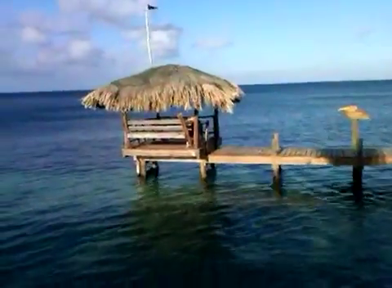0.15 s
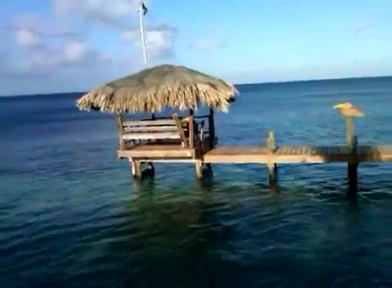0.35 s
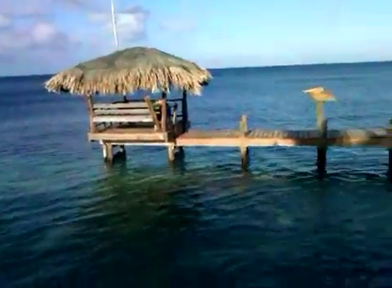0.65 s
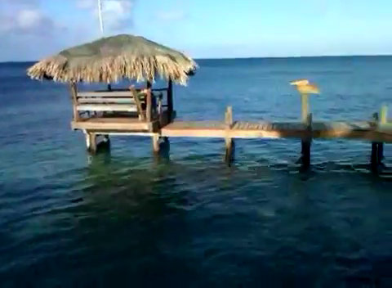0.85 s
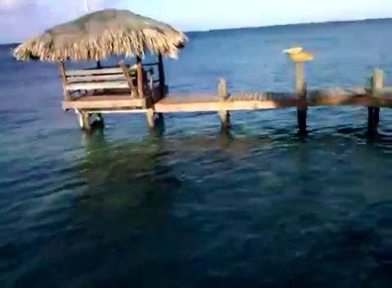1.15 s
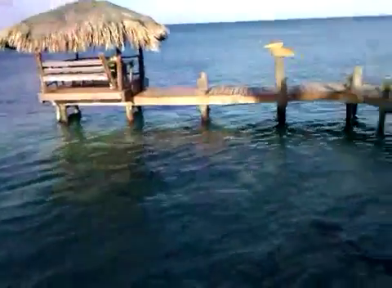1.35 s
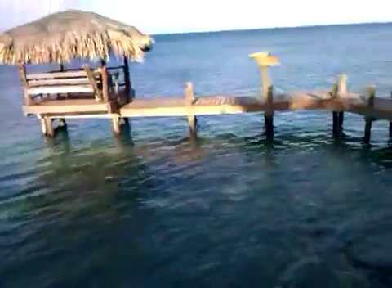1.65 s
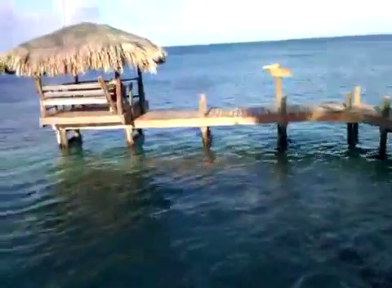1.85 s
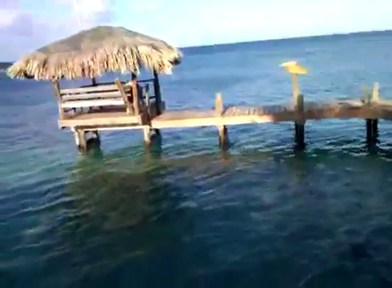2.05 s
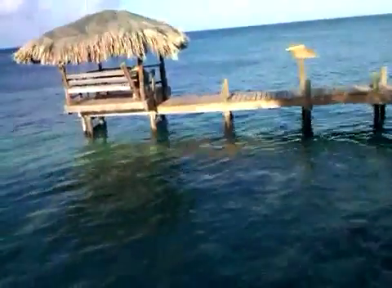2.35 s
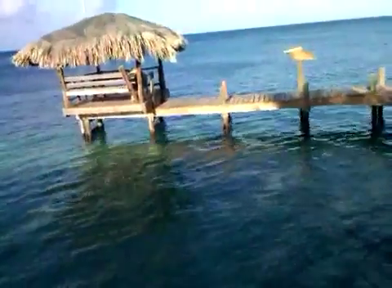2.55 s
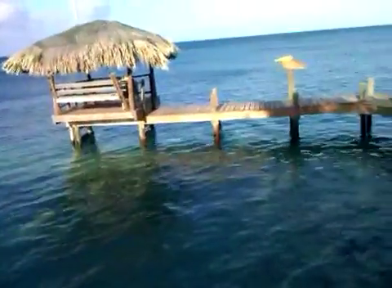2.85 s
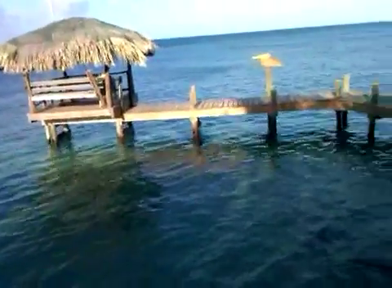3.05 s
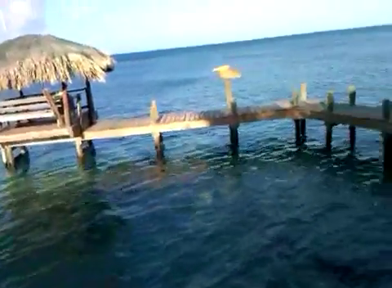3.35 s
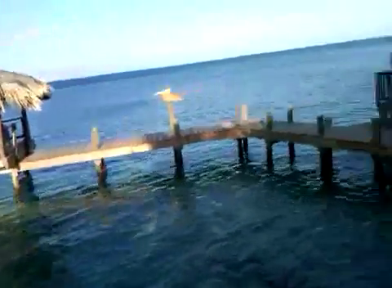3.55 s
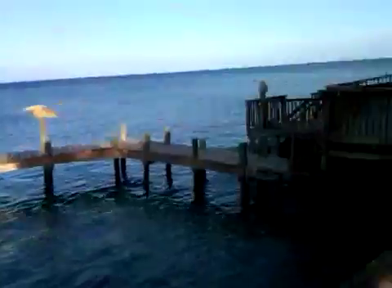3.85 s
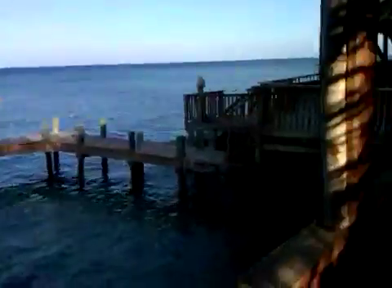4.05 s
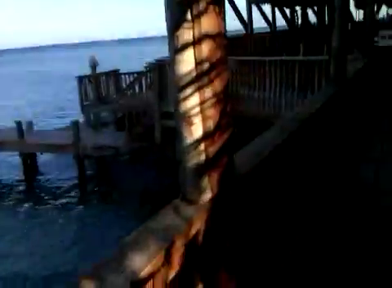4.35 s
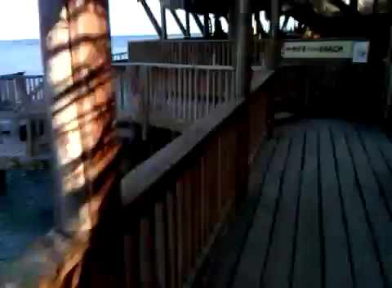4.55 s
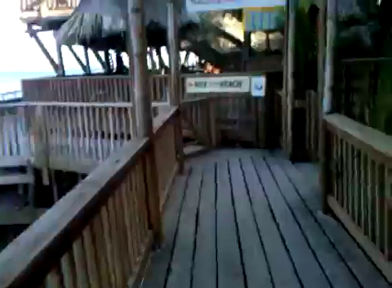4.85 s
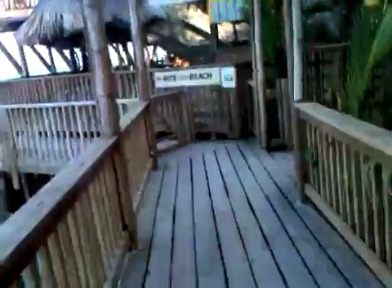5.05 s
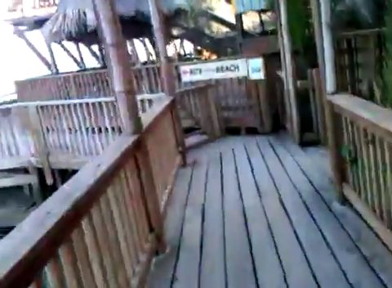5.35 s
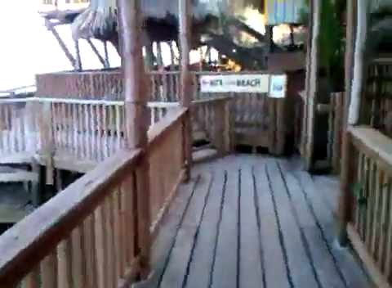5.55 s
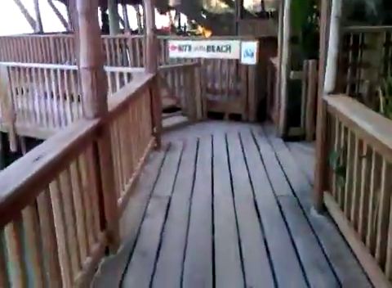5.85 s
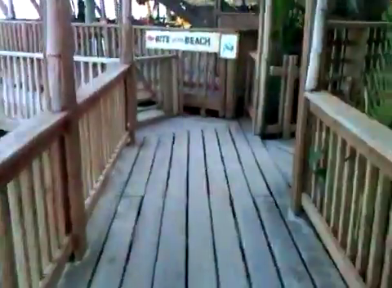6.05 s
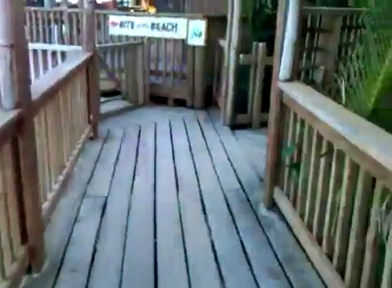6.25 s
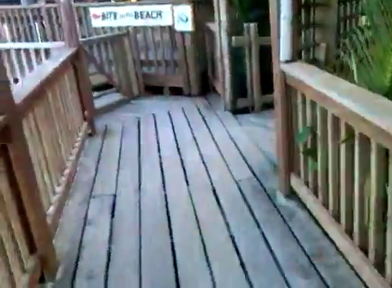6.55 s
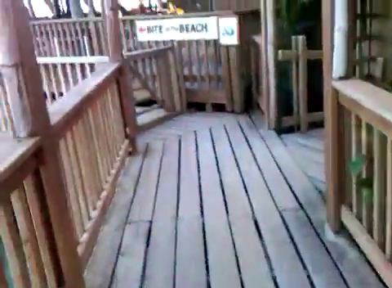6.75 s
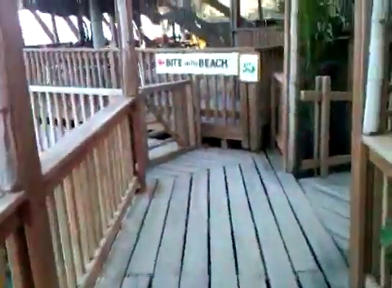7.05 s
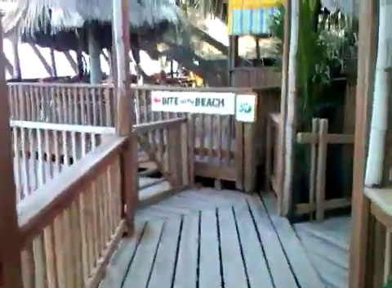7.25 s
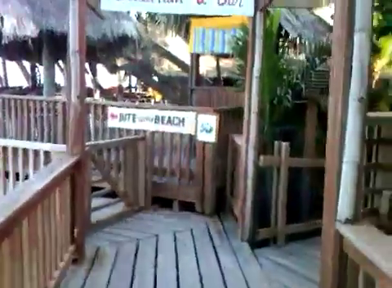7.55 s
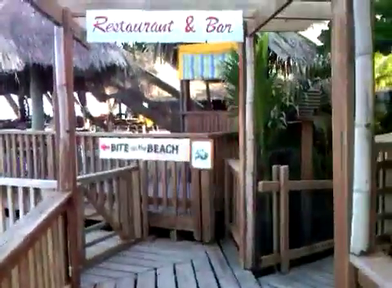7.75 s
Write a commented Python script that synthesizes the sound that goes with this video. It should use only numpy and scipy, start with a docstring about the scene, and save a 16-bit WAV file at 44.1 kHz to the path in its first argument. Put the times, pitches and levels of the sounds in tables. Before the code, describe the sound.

Close seaside water beneath a wooden dock, with a very faint open-water hiss and low hum behind. For the first second it is quiet, only little round bubbles and plops. At about 1.1 s a wave slaps in, with hollow gulps around 1.2 to 1.5 s, then bright, ragged fizz and spray peaking from 1.7 to 2.05 s. Sloshing and spatter continue, with a big rounded gulp at 3.15 s and low thumps of the jolted microphone around 3.3 to 4 s. The water thins into trickling and lapping, nearly calm by 5 s. Soft, dull footsteps knock on planks near 5.7 and 5.8 s, among small bubbles at 6 to 6.4 s. At 6.45 s one dry, sharp sandal slap stands out, the loudest sound. Faint taps follow at 6.8 s, a plank knock at 7.16 s and a brief gritty scuff at 7.45 s, fading into quiet lapping.

```python
"""Wave under a dock, sandals on the boards

Sea water laps under a wooden dock; one wave runs in, sloshes round the pilings and fizzes out.
Its body is filtered noise plus swarms of ringing bubbles; single plops and splashes stand out on top.
Then someone walks off along the boardwalk: struck modes knock and slap, filtered noise scuffs the planks.
Wind and hand jolt the microphone now and then, as short low sine pushes."""
import sys
import numpy as np
from scipy import signal
from scipy.fft import rfft, irfft
from scipy.io import wavfile
from scipy.ndimage import uniform_filter1d

SR = 44100
rng = np.random.default_rng(int(sys.argv[2]) if len(sys.argv) > 2 else 0)


def inscribe(sig):
    """Save sig as 16-bit PCM at rate SR to the path in sys.argv[1].

    A 1-D sig is mono; a 2-D sig holds one channel per row.
    Samples are clipped to [-1, 1] before scaling.
    """
    pcm = np.round(np.clip(np.atleast_2d(sig).T, -1, 1) * 32767)
    wavfile.write(sys.argv[1], SR, pcm.astype(np.int16))


N = 348390
TIMES = np.arange(N) / SR
SLOW_TIMES = np.arange(0, N / SR + .008, .004)  # seconds, grid of the level curves


def gain_of(db):
    """Decibels to a factor."""
    return 10 ** (np.asarray(db) / 20)


def evened(x):
    """Scales to rms 1."""
    return x / np.sqrt(np.mean(x ** 2) + 1e-20)


def add(mix, start_s, sound):
    """Mixes a sound in at its start time."""
    part = mix[round(start_s * SR):][:len(sound)]
    part += sound[:len(part)]


def read(spectrum, hz):
    """Reads a spectrum in dB on a log-frequency axis, down at -100 dB beyond its ends."""
    point_hz, level_db = np.transpose(spectrum)
    return np.interp(np.log(hz + 1), np.log(point_hz + 1), level_db, left=-100, right=-100)


def noise(spectrum, patchy_db, flicker_db):
    """Random short-time spectra with drifting patches and a flicker shared by all pitches."""
    frames, bins = N // 128 + 8, 257
    real, imag, patches = rng.standard_normal((frames, bins, 3)).T
    patches = uniform_filter1d(patches, size=7, axis=0)  # across pitch
    patches = evened(uniform_filter1d(patches, size=7, axis=1))  # across time
    flicker = evened(uniform_filter1d(rng.standard_normal(frames), size=4))
    spectra = (real + 1j * imag) * gain_of(patchy_db * patches + flicker_db * flicker)
    x = signal.istft(spectra, nperseg=512, noverlap=384)[1][:N]
    shape = gain_of(read(spectrum, np.fft.rfftfreq(N, 1 / SR)))
    return evened(irfft(rfft(x) * shape, N))


def bubble(hz, cycles, glide, swell_share=0.099):
    """A pocket of air swells into ringing, glides in pitch and dies away over some cycles."""
    turns = np.arange(int(3 * cycles * SR / hz)) * hz / SR
    shape = (1 - np.exp(-turns / (swell_share * cycles))) * np.exp(-2.2 * turns / cycles)
    return shape * np.sin(2 * np.pi * turns * (1 + glide * turns / cycles))


def bubbling(spectrum, per_s, cycles, spread_db, count=24):
    """A random swarm of bubbles whose pitches fill a spectrum; a few are large."""
    born = rng.random(N) < per_s / SR
    size = gain_of(spread_db * np.minimum(rng.exponential(1, N), 4)) * born
    kind = rng.integers(0, count, N)
    out = np.zeros(N)
    for k, hz in enumerate(np.geomspace(spectrum[1][0], spectrum[-2][0], num=count)):
        grain = bubble(hz, cycles, glide=0.037)
        weight = gain_of(read(spectrum, hz)) * np.sqrt(hz) / np.linalg.norm(grain)
        out += weight * signal.oaconvolve(size * (kind == k), grain)[:N]
    return evened(out)


RISE_SHARE = 0.72  # rise of a swell as a share of its fall


def swell(t, peak_s, level_db, length_s):
    """Power of a bell-shaped swell that rises faster than it falls."""
    u = (t - peak_s) / (length_s * np.where(t < peak_s, RISE_SHARE, 1))
    return gain_of(2 * level_db) * np.exp(-2 * u ** 2)


# far hiss of open water: pitch_hz [Hz], density_db [dB per Hz, relative]
SEA_SPECTRUM = [(90, -31), (150, 5.5), (400, 2), (1000, -1.5), (2200, -11.5), (3300, -1), (4500, -15),
                (6500, -16.5), (7400, -34)]
SEA_DB = -74.5


def sea():
    """Far, even hiss of open water: noise held at one overall level."""
    return gain_of(SEA_DB) * noise(SEA_SPECTRUM, patchy_db=1.9, flicker_db=1.7)


# faint steady low band: pitch_hz [Hz], density_db [dB per Hz, relative]
DRONE_SPECTRUM = [(70, -24.5), (105, -4.5), (125, -6.5), (145, -6.5), (190, -21.5)]
DRONE_DB = -74


def drone():
    """A narrow low band of noise held at one overall level."""
    return gain_of(DRONE_DB) * noise(DRONE_SPECTRUM, patchy_db=0.99, flicker_db=0.96)


# one wave runs in and fizzes out, then light lapping; guide levels that the layers follow:
# time_s [s], slosh_db (low) [dB], gurgle_db (middle) [dB], fizz_db (treble) [dB]
WAVE_COURSE = [(0.0, -71.5, -69, -73), (0.42, -69.5, -70.5, -76.5), (0.58, -79, -74.5, -81),
               (0.7, -63.5, -64, -74.5), (1.02, -64, -70.5, -78.5), (1.09, -57.5, -68, -75),
               (1.152, -48, -50, -47.5), (1.25, -50, -46, -53), (1.35, -59.5, -58.5, -49),
               (1.411, -43, -41.5, -42.5), (1.58, -41.5, -40.5, -37.5), (1.71, -43, -52, -30),
               (1.745, -47.5, -48.5, -33.5), (1.8, -46, -50, -29), (1.845, -50.5, -48, -35),
               (1.939, -44.5, -52.5, -27.5), (1.97, -45.5, -52, -34), (1.995, -47, -53, -28.5),
               (2.035, -49.5, -58.5, -32), (2.07, -51, -44.5, -44.5), (2.24, -50, -52.5, -45),
               (2.45, -53, -49, -48), (2.8, -54.5, -52, -48.5), (2.9, -50, -51, -45),
               (3.17, -46, -44.5, -46.5), (3.3, -50.5, -53, -53.5), (3.6, -57.5, -50.5, -47.5),
               (4.05, -58, -52.5, -58), (4.37, -61, -56, -57.5), (4.65, -54.5, -52, -57),
               (5.02, -61, -61.5, -64.5), (5.09, -67.5, -61, -75), (5.5, -67.5, -70, -73.5),
               (6.3, -66.5, -61.5, -71.5), (6.67, -72.5, -71.5, -75.5), (7.0, -75, -71, -72.5),
               (7.42, -72, -75, -81), (7.9, -75, -66.5, -88)]


def wave_levels():
    """The wave's low, middle and treble levels in dB, drawn as lines between the points."""
    time_s, *levels = np.transpose(WAVE_COURSE)
    return np.array([np.interp(SLOW_TIMES, time_s, db) for db in levels])


# low rumble: pitch_hz [Hz], density_db [dB per Hz, relative]
RUMBLE_SPECTRUM = [(12, -10), (30, 3), (50, -1.5), (75, -1.5), (110, -2.5), (160, -17)]
# swells of the rumble: peak_s [s], level_db [dB], length_s (fall to -8.7 dB) [s]
RUMBLE_SWELLS = [(0.034, -75, 0.035), (0.337, -65, 0.043), (.66, -65, .05), (0.998, -60, .03),
                 (1.07, -59, 0.034), (1.223, -50, 0.024), (1.497, -47, 0.067), (1.924, -55, 0.045),
                 (2.263, -54.5, 0.1), (2.628, -62, 0.051), (2.94, -62, 0.035), (3.057, -62, 0.04),
                 (3.172, -53, 0.049), (3.3, -56, 0.036), (3.46, -53, 0.065), (3.8, -53, 0.054),
                 (3.933, -59, 0.12), (4.49, -65, .05), (4.65, -67, .1), (4.847, -62.5, 0.12),
                 (5.1, -66.5, .08), (5.37, -65, 0.13), (5.74, -69, .04), (5.83, -61, 0.067),
                 (6.103, -65, 0.13), (6.325, -64, 0.071), (6.442, -58, 0.062), (6.632, -64, 0.061),
                 (6.937, -58.5, 0.13), (7.198, -68, 0.068), (7.479, -61, 0.048), (7.63, -70.5, 0.053)]
RUMBLE_DB, RUMBLE_SHARE = -72, 0.31  # resting level, and dB it moves for each dB of the slosh


def rumble(low_db):
    """Low noise alone, partly following the slosh, with swells added in power."""
    power = gain_of(2 * (RUMBLE_DB + RUMBLE_SHARE * (low_db - low_db.mean())))
    power = power + sum(swell(SLOW_TIMES, *row) for row in RUMBLE_SWELLS)
    return np.interp(TIMES, SLOW_TIMES, np.sqrt(power)) * noise(RUMBLE_SPECTRUM, 0.94, 0.96)


# low jolts at the microphone: start_s [s], level_db [dB], pitch_hz [Hz], cycles [count]
JOLT_HITS = [(2.029, -41, 60.4, 0.63), (3.277, -41, 60, 1.3), (3.437, -33.5, 61.4, 1.1),
             (3.552, -44.5, 79, 1), (3.752, -45, 33, 2.2), (4.001, -41, 45, 1.1), (5.684, -42, 150, 2),
             (5.809, -48, 69.6, 0.92), (6.09, -56, 54.5, 1.6), (6.927, -44.5, 157, 3.9)]


def jolts():
    """Each jolt pushes the membrane out and back a few times at most."""
    out = np.zeros(N)
    for start_s, level_db, hz, cycles in JOLT_HITS:
        turns = np.arange(round(cycles * SR / hz)) * hz / SR
        push = np.sin(2 * np.pi * turns) * np.sin(np.pi * (turns / cycles) ** 1.1)
        add(out, start_s, gain_of(level_db) * push)
    return out


# spectra of the water from deep to treble: pitch_hz [Hz], density_db [dB per Hz, relative]
DEEP_SPECTRUM = [(80, -22), (125, -4.5), (200, 0.5), (310, 2.5), (420, -23.5)]
SLOSH_SPECTRUM = [(250, -18), (350, -0.5), (450, -1.5), (600, -4.5), (800, -21.5)]
GURGLE_SPECTRUM = [(450, -37.5), (620, -3.5), (900, -1), (1250, -6.5), (1500, -13)]
SPATTER_SPECTRUM = [(900, -28.5), (1300, -4.5), (1600, 0), (2000, 0.5), (2800, -6.5), (3500, -44.5)]
SPRAY_SPECTRUM = [(2200, -9.5), (2800, -6), (3500, -1.5), (3950, -3), (4200, -27.5)]
FIZZ_SPECTRUM = [(3800, -22), (4080, -0.5), (4900, -2.5), (5500, -13.5), (6000, -32.5)]
MIST_SPECTRUM = [(4900, -21.5), (5500, 0.5), (6300, -6), (7200, -8.5), (7600, -42)]


def churning_layers():
    """From deep slosh to fizz, each layer is bubbles over a churning hiss."""
    deep = noise(DEEP_SPECTRUM, 2.7, 1.4)
    deep += 0.23 * bubbling(DEEP_SPECTRUM, 80, cycles=2.2, spread_db=6.5, count=10)
    slosh = noise(SLOSH_SPECTRUM, 0.66, 2.5)
    slosh += 0.66 * bubbling(SLOSH_SPECTRUM, 120, cycles=2.5, spread_db=0.5, count=12)
    gurgle = noise(GURGLE_SPECTRUM, 2.97, 1.1)
    gurgle += 0.79 * bubbling(GURGLE_SPECTRUM, 270, cycles=6, spread_db=4)
    spatter = noise(SPATTER_SPECTRUM, 0.98, 0.94)
    spatter += 0.7 * bubbling(SPATTER_SPECTRUM, 500, cycles=14, spread_db=5.5, count=14)
    spray = noise(SPRAY_SPECTRUM, 2.6, 1.2)
    spray += 0.6 * bubbling(SPRAY_SPECTRUM, 700, cycles=8, spread_db=5, count=8)
    fizz = noise(FIZZ_SPECTRUM, 3.2, 1.2)
    fizz += 0.69 * bubbling(FIZZ_SPECTRUM, 900, cycles=19, spread_db=4.5, count=12)
    mist = noise(MIST_SPECTRUM, 2, 1.5)
    mist += 0.5 * bubbling(MIST_SPECTRUM, 1200, cycles=2.8, spread_db=6.5, count=8)
    return [evened(layer) for layer in (deep, slosh, gurgle, spatter, spray, fizz, mist)]


# how each layer follows the wave, deep to mist: centre_hz [Hz], offset_db [dB],
# place (between the three guide levels) [0-2], contrast (around MIDDLE_DB) [dB per dB of the wave]
LAYER_RESPONSE = [(220, -4, 0.05, 1.06), (410, -0.8, 0.12, 1.08), (900, -0.32, 0.84, 1.11),
                  (2000, -6, 1.4, 0.94), (3300, -6.5, 1.75, 1.2329), (4600, -2.5, 1.654, 1.02),
                  (6000, -9, 1.76, 0.91)]
# surges against the pilings: peak_s [s], level_db (at the centre) [dB], centre_hz [Hz],
# length_s (fall to -8.7 dB) [s]
PILING_SURGES = [(0.046, -69, 3500, 0.018), (0.163, -59, 220, 0.025), (0.326, -56, 248, 0.024),
                 (0.658, -56.5, 496, 0.028), (0.944, -61.5, 900, 0.042), (1.064, -57.5, 330, .05),
                 (1.114, -50, 900, 0.027), (1.163, -66, 4000, 0.022), (1.62, -44, 3300, 0.033),
                 (1.205, -38.5, 565, 0.037), (1.391, -43.5, 253, 0.025), (1.453, -50, 650, 0.068),
                 (1.507, -35, 465, 0.028), (1.662, -46.5, 302, 0.083), (1.707, -36, 950, 0.019),
                 (1.785, -35.5, 455, 0.061), (1.934, -38, 563, 0.11), (1.936, -42.5, 2000, 0.043),
                 (2.022, -39.5, 480, 0.036), (2.625, -52, 3960, 0.051), (2.955, -54.5, 2000, 0.029),
                 (3.328, -57, 220, .03), (2.147, -41.5, 476, 0.072), (2.507, -46, 730, 0.043),
                 (2.601, -43.5, 460, 0.069), (2.862, -42, 680, 0.025), (2.94, -45, 400, 0.041),
                 (3.135, -41, 1000, 0.089), (3.144, -34.5, 290, 0.071), (3.372, -53, 900, 0.043),
                 (3.498, -52.5, 2460, 0.038), (3.7, -54.5, 940, 0.28), (3.806, -54.5, 2000, 0.021),
                 (4.243, -53, 840, 0.054), (4.434, -52.5, 1340, 0.097), (4.49, -51, 240, 0.069),
                 (4.596, -47.5, 820, 0.078), (4.723, -67, 278, .05), (4.804, -56, 278, 0.039),
                 (4.01, -57, 450, 0.04), (3.538, -69, 420, .06), (4.574, -54, 4100, 0.06),
                 (5.244, -60, 1000, .04), (5.525, -61, 870, 0.084), (5.727, -59.5, 654, 0.073),
                 (5.84, -59.5, 970, .05), (5.6, -64, 330, 0.038), (6.23, -59.5, 398, 0.029),
                 (6.064, -61.5, 420, 0.061), (6.33, -66, 810, 0.053), (6.518, -63.5, 786, 0.1),
                 (6.889, -60.5, 900, 0.15), (6.923, -64, 201, 0.11), (6.372, -59, 229, 0.031),
                 (5.794, -66, 190, 0.043), (7.837, -70, 1070, 0.038), (7.186, -67, 1120, 0.11),
                 (7.28, -65, 334, 0.039), (7.556, -60, 870, 0.039)]
MIDDLE_DB = -50
SURGE_OCTAVES = 0.96  # distance in pitch at which a surge is 8.7 dB weaker


def wave(levels):
    """Each layer follows the wave's levels, and surges lift the layers near their pitch."""
    out = np.zeros(N)
    places = np.arange(len(levels))
    for layer, (centre_hz, offset_db, place, contrast) in zip(churning_layers(), LAYER_RESPONSE):
        blend = np.maximum(1 - abs(place - places), 0)  # cross-fade between neighbouring levels
        level_db = offset_db + MIDDLE_DB + contrast * (blend @ levels - MIDDLE_DB)
        power = gain_of(2 * level_db)
        for peak_s, surge_db, hz, length_s in PILING_SURGES:
            nearness = np.exp(-2 * (np.log2(hz / centre_hz) / SURGE_OCTAVES) ** 2)
            power = power + swell(SLOW_TIMES, peak_s, surge_db, length_s) * nearness
        out += np.interp(TIMES, SLOW_TIMES, np.sqrt(power)) * layer
    return out


# drops that burst close by: start_s [s], peak_db [dB], centre_hz [Hz], t60_s [s]
SPLASH_BURSTS = [(1.1402, -41, 2240, 0.24), (1.215, -33, 1970, 0.13), (1.6908, -30, 4300, 0.045),
                 (1.7536, -39, 4210, 0.066), (1.787, -27, 4500, 0.046), (1.9833, -28.5, 3360, 0.21),
                 (2.2333, -44, 4120, 0.028), (2.317, -45, 4760, 0.06), (2.353, -31.5, 2700, 0.053),
                 (2.4783, -31.5, 2150, 0.052), (2.5756, -37, 4400, 0.047), (2.739, -34.5, 3220, 0.077),
                 (2.8373, -44, 4650, 0.057), (2.933, -39, 4630, 0.069), (3.562, -38, 4370, 0.039),
                 (3.8076, -39, 4240, 0.038), (3.899, -34, 2280, 0.017), (4.42, -38, 1680, 0.079),
                 (5.306, -56, 5000, .08), (5.26, -41, 2000, 0.14), (5.468, -55.5, 1670, 0.14),
                 (5.525, -63, 1590, 0.12), (5.7067, -54, 1800, 0.15), (5.8953, -53, 4660, 0.065),
                 (6.2783, -53, 3570, 0.039), (6.295, -49, 2500, 0.077), (6.356, -55.5, 2030, 0.08),
                 (6.478, -46.5, 4260, 0.14)]


def splashes():
    """Each burst is a puff of noise, broad around its centre, that dies at once."""
    out, t = np.zeros(N), np.arange(SR // 10) / SR
    for start_s, peak_db, hz, t60_s in SPLASH_BURSTS:
        puff = rng.standard_normal(len(t))
        band_filter = signal.butter(2, [0.5 * hz, 1.57 * hz], "band", fs=SR, output="sos")
        band = signal.sosfilt(band_filter, puff)
        burst = gain_of(-60 * t / t60_s) * (1 - np.exp(-t / 0.0011)) * band
        add(out, start_s, gain_of(peak_db) * burst / abs(burst).max())
    return out


# single bubbles and plops: start_s [s], level_db (before the envelope) [dB], pitch_hz (at the start) [Hz],
# cycles (to decay by 19 dB) [count], glide (half the pitch change over those cycles) [share of the pitch]
PLOP_BUBBLES = [(.15, -49, 392, 17, 0.014), (.263, -43, 590, 4.9, 0.022), (0.332, -55, 297, 2.1, .02),
                (0.605, -50.5, 975, 33, 0.051), (.65, -38, 577, 13.4, 0.029), (.687, -39, 656, 9, -0.03),
                (.71, -50, 623, 32, -0.068), (.755, -52.5, 360, 24, 0.094), (.772, -57, 1216, 12, 0.018),
                (.797, -52.5, 683, 20, 0.013), (.938, -45.5, 490, 2.3, 0.016), (1.02, -60, 560, 15, -0.05),
                (1.075, -42, 560, 5, 0), (1.099, -41.5, 1410, 12, 0), (.84, -48.5, 590, 16, 0.017),
                (.865, -47, 695, 12, 0.027), (1.04, -44.5, 476, 28, -0.0022), (1.1, -40, 960, 7, .02),
                (1.133, -32.5, 410, 4.1, 0.0048), (1.206, -26.5, 667, 13, 0.032),
                (1.382, -32, 363, 4.7, -0.013), (1.429, -26, 438, 4.9, 0.0055), (1.49, -26, 401, 7.3, 0.04),
                (1.767, -32.5, 209, 9.1, -0.0089), (2.252, -39, 467, 15, -0.011),
                (2.432, -28.5, 457, 4.8, 0.046), (2.478, -31, 1073, 16, 0.02),
                (2.607, -41, 200, 6, -0.0091), (2.836, -31, 690, 10.4, 0.0011), (2.86, -38, 266, 22, 0.028),
                (2.864, -32.5, 840, 10, -0.0014), (3.143, -20.5, 369, 9.5, 0.0042),
                (3.164, -22.5, 324, 4.4, 0.0058), (3.61, -41.5, 368, 13, 0.016),
                (4.323, -35.5, 783, 12, 0.031), (4.469, -36.5, 950, 7.4, 0.013),
                (4.205, -42, 930, 38, 0.021), (4.59, -36.5, 787, 18, 0.025),
                (4.625, -41, 1055, 27, -0.0077), (4.68, -47, 854, 13, 0.0044),
                (4.473, -38.5, 203, 6.9, .02), (5.018, -42.5, 720, 10, 0.061), (5.148, -50, 990, 20, 0.017),
                (5.26, -38, 900, 8.8, -0.0076), (5.363, -48.5, 1010, 8.5, .02),
                (5.528, -49.5, 1140, 33, -.02), (5.1, -49, 900, 27, 0.0075), (5.233, -50, 1290, 12, -.03),
                (5.265, -50, 1800, 14, .03), (5.274, -41, 2300, 16, .02), (5.527, -43, 1610, 4, -0.01),
                (5.068, -50, 4300, 36, -0.0057), (5.858, -51, 5200, 30, 0), (5.496, -48, 990, 9.7, .02),
                (5.735, -46.5, 945, 11, 0.037), (5.555, -47, 670, 7.6, 0.017), (6.026, -39, 800, 10, 0.016),
                (6.04, -41.5, 560, 8.9, 0.017), (6.059, -42, 600, 11, 0.013), (6.044, -41, 850, 14, 0.0036),
                (6.078, -45, 517, 8, 0), (6.027, -52, 2210, 12, 0.0045), (6.064, -51, 1400, 14, 0),
                (6.097, -50, 800, 7, 0), (6.213, -49, 417, 6.4, .02), (6.286, -46, 1390, 12, .03),
                (6.298, -47, 1480, 10, -0.0056), (6.301, -43, 940, 14, -0.032),
                (6.259, -34.5, 955, 19, 0.019), (6.283, -39.5, 937, 16, -0.023),
                (6.379, -40, 900, 8.6, -0.00053), (7.236, -48, 360.5, 19.5, 0.084),
                (7.367, -44, 900, 15, 0.015), (7.554, -51, 950, 10, 0.013)]


def plops():
    """Bubbles large enough to be heard one by one; the churning surface makes them flutter."""
    out = np.zeros(N)
    for start_s, level_db, *tone in PLOP_BUBBLES:
        add(out, start_s, gain_of(level_db) * bubble(*tone))
    flutter = uniform_filter1d(rng.standard_normal(N), size=120)
    flutter = evened(uniform_filter1d(flutter, size=120))
    return out * (1 + 0.41 * flutter)


# gritty noise: pitch_hz [Hz], density_db [dB per Hz, relative]
GRIT_SPECTRUM = [(500, -10.5), (1000, -4), (1750, 0), (2400, -2.5), (3200, -8.5), (4500, -12.5),
                 (6500, -22.5), (7500, -34.5)]
RASP_HZ, RASP_SAG = 2100, 0.61  # pitch at the start, and the share of it lost by the end
RASP_WIDTH_HZ, RASP_DB = 260, -3  # bandwidth, and gain beside the plain noise


def gritty_strokes(rows):
    """Grainy noise with a sinking resonant rasp; each stroke swells to a peak and fades."""
    out = np.zeros(N)
    caught = rng.random(N) < 900 / SR  # grains catch one by one
    sand = gain_of(5.6 * np.minimum(rng.exponential(1, N), 4)) * caught
    catching = evened(uniform_filter1d(sand, size=60))
    grit = evened(noise(GRIT_SPECTRUM, 3.1, 0.54) * (1 + 0.29 * catching))
    r = np.exp(-np.pi * RASP_WIDTH_HZ / SR)
    for start_s, length_s, level_db, peak_place, dull_hz in rows:
        u = np.linspace(0, 1, round(length_s * SR))
        bend = np.log(.5) / np.log(np.clip(peak_place, .05, .95))  # puts the sine's top at the peak
        stroke = np.sin(np.pi * u ** bend) ** 1.7
        dull = signal.butter(4, dull_hz, fs=SR, output="sos")
        plain = signal.sosfilt(dull, grit[round(start_s * SR):][:len(u)])
        # sinking rasp: shift its pitch to zero, smooth, shift back
        turn = np.exp(2j * np.pi * np.cumsum(RASP_HZ * (1 - RASP_SAG * u)) / SR)
        rasp = 2 * (turn * signal.lfilter([1 - r], [1, -r], plain / turn)).real
        add(out, start_s, gain_of(level_db) * (gain_of(RASP_DB) * rasp + plain) * stroke)
    return out


# strokes of gritty noise: start_s [s], length_s [s], level_db (before shaping) [dB],
# peak_place (kept within 0.05-0.95) [0-1], dull_hz (treble above is dulled) [Hz]
NOISE_STROKES = [(0.033, 0.028, -60.5, 0.03, 6000), (5.234, 0.02, -53, 0.12, 5000),
                 (5.249, 0.047, -52, 0.32, 6000), (6.418, 0.034, -39, 0.8, 2390),
                 (7.453, 0.082, -41, 0.27, 6500), (7.55, 0.035, -62.5, 0.4, 2000)]
LEAD_IN_S = 6.418  # start of the one stroke that is no scuff


def scuffs():
    """Soles dragged over the grain; the rasp sinks as the sole slows."""
    return gritty_strokes([row for row in NOISE_STROKES if row[0] != LEAD_IN_S])


def lead_in_noise():
    """Dull noise swelling just before the slap."""
    return gritty_strokes([row for row in NOISE_STROKES if row[0] == LEAD_IN_S])


# faint short gliding tones just before the slap: start_s [s], level_db (before the envelope) [dB],
# pitch_hz (at the start) [Hz], cycles (to decay by 19 dB) [count],
# glide (half the pitch change over those cycles) [share of the pitch]
LEAD_IN_TONES = [(6.4205, -39, 2900, 21, 0.011), (6.432, -38.5, 2100, 25, -.09),
                 (6.429, -39, 680, 14, 0.039)]


def lead_in_tones():
    """Faint short sines that swell, glide and die away just before the slap."""
    out = np.zeros(N)
    for start_s, level_db, *tone in LEAD_IN_TONES:
        add(out, start_s, gain_of(level_db) * bubble(*tone, swell_share=.3))
    return out


def struck(modes, load_s, level_db, tuning, hardness):
    """A blow rings the modes; a harder one wakes the upper ones and adds grit."""
    t = np.arange(SR // 10) / SR
    ring = np.zeros(len(t))
    for hz, mode_db, t60_s in modes:
        tilt_db = -4.4 * (1.5 - hardness) * np.log2(hz / 1000)
        ring += gain_of(mode_db + tilt_db - 60 * t / t60_s) * np.sin(2 * np.pi * hz * tuning * t)
    ring *= (1 - np.exp(-t / load_s)) ** 2  # the sole takes a moment to load the wood
    rattle = 0.37 * np.diff(rng.standard_normal(len(t) + 1)) * np.exp(-t / 0.0041)  # grit under the sole
    rattle = uniform_filter1d(uniform_filter1d(rattle, size=6), size=3)
    return gain_of(level_db) * (ring / abs(ring).max() + 1.9 * hardness * rattle)


# ringing of a plank: pitch_hz (before tuning) [Hz], level_db (before the hardness tilt) [dB], t60_s [s]
PLANK_MODES = [(195, -25, 0.071), (840, -3, 0.048), (1070, 10.5, 0.015), (1790, 2.5, 0.027),
               (3300, -3, 0.017), (3570, -2, 0.02), (4000, -5, 0.031), (6100, -30, .012)]
# soles on planks: start_s [s], level_db (peak of the ring) [dB], tuning [factor], hardness [0-1]
KNOCK_HITS = [(5.685, -46, 0.67, .1), (5.833, -41.5, 0.97, 0), (7.161, -35.5, 0.96, 1)]


def knocks():
    """Soles strike the planks and ring their modes."""
    out = np.zeros(N)
    for start_s, *blow in KNOCK_HITS:
        add(out, start_s, struck(PLANK_MODES, 0.0016, *blow))
    return out


# ringing of a sandal: pitch_hz (before tuning) [Hz], level_db (before the hardness tilt) [dB], t60_s [s]
SANDAL_MODES = [(188, -23.5, 0.024), (550, -3, 0.02), (1054, -1, 0.01), (1490, 17.5, 0.0062),
                (1800, 11, 0.006), (2620, -11.5, 0.015), (3300, -10, 0.017), (3900, -24, 0.03),
                (5120, -11.5, 0.014), (5500, -3, 0.0059), (6500, -27, 0.008)]
# a sandal slaps shut: start_s [s], level_db (peak of the ring) [dB], tuning [factor], hardness [0-1]
SLAP_HITS = [(6.423, -32, 0.76, 0.4), (6.447, -24.5, 1, 0.95), (6.4492, -17.5, 0.83, 1),
             (6.4513, -7.5, 1.03, 1), (6.8074, -38, 0.83, 0), (6.84, -43.5, 1.13, 1)]


def sandal_slaps():
    """Dry, short modes ring as the sandal slaps shut."""
    out = np.zeros(N)
    for start_s, *blow in SLAP_HITS:
        add(out, start_s, struck(SANDAL_MODES, 0.00069, *blow))
    return out


def scene():
    """Everything reaches one microphone."""
    levels = wave_levels()
    background = sea() + drone() + rumble(levels[0]) + jolts()
    water = wave(levels) + splashes() + plops()
    steps = scuffs() + knocks() + sandal_slaps()
    lead_in = lead_in_noise() + lead_in_tones()
    return (background + water + lead_in + steps)[None]


EDGE_HZ = 7951  # band limit


def record(dry):
    """The microphone dulls at the very top; then the band limit."""
    dull = signal.oaconvolve(dry, signal.firwin(201, 7250., fs=SR)[None], "same")
    band_limit = signal.firwin(511, EDGE_HZ, window=("kaiser", 9), fs=SR)
    return signal.oaconvolve(dull, band_limit[None], "same")


dry = scene()
out = record(dry)
inscribe(out)
```